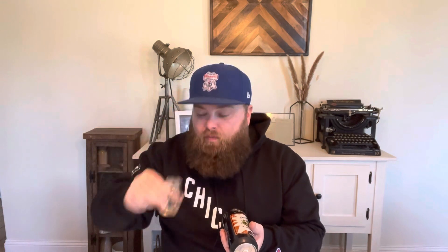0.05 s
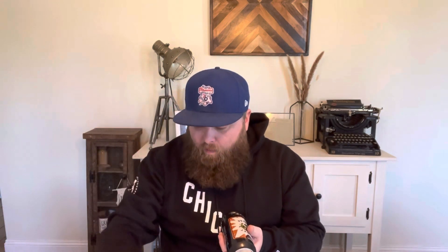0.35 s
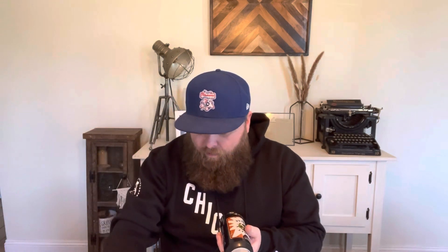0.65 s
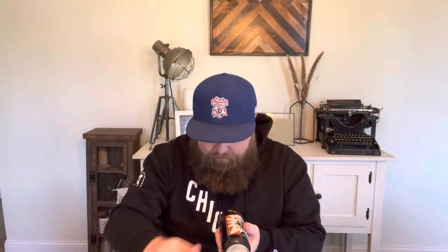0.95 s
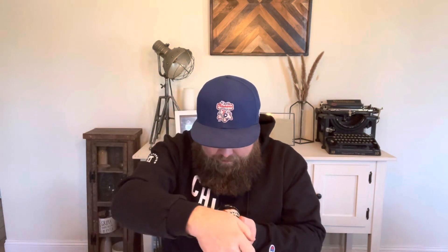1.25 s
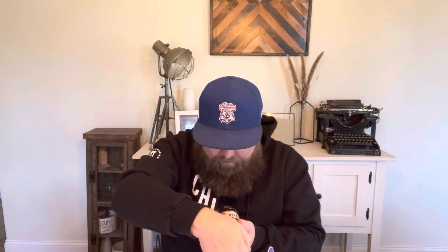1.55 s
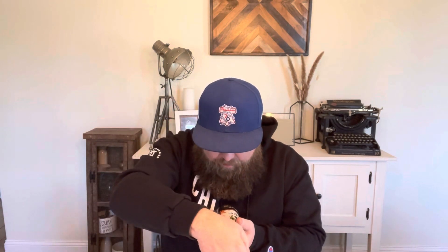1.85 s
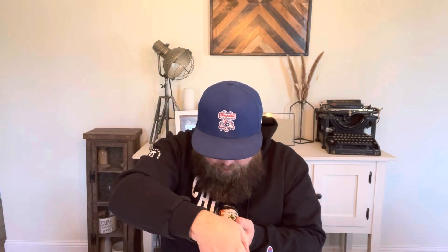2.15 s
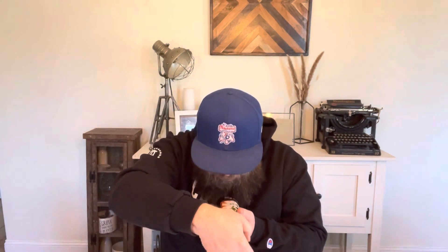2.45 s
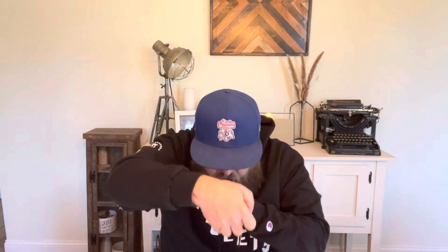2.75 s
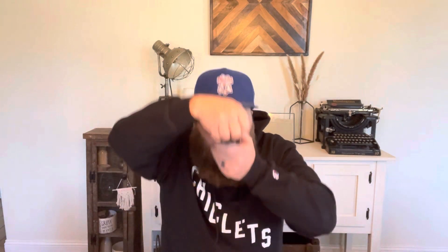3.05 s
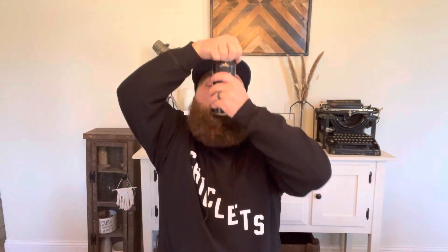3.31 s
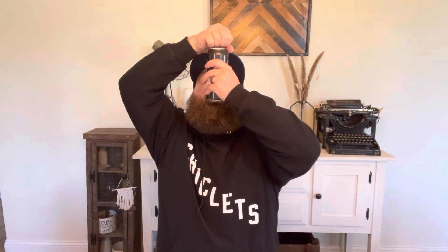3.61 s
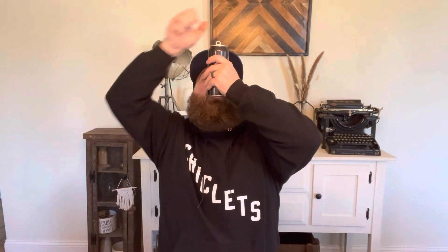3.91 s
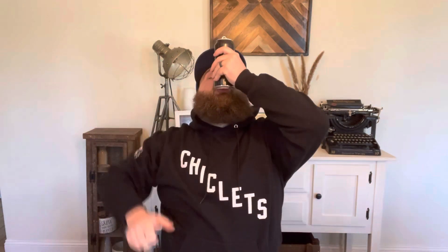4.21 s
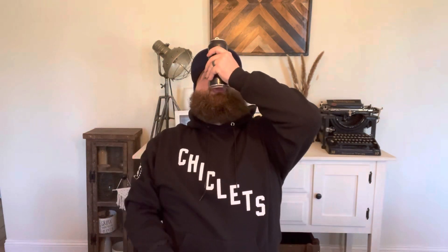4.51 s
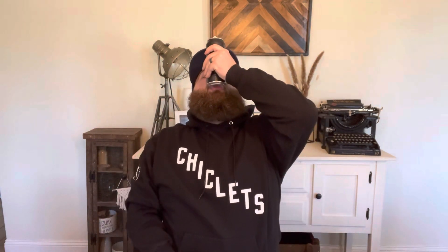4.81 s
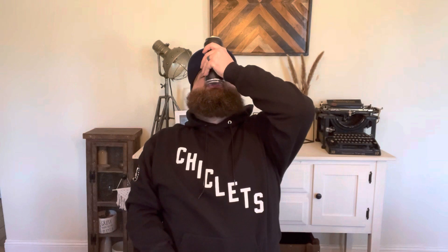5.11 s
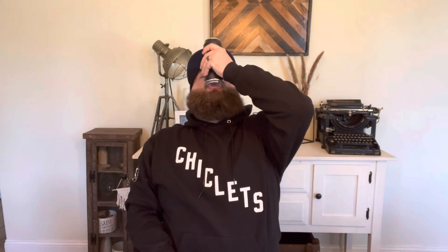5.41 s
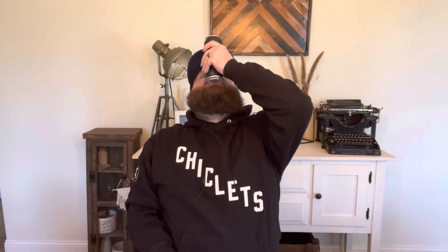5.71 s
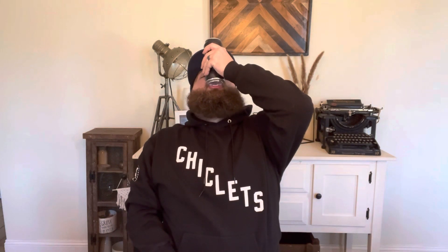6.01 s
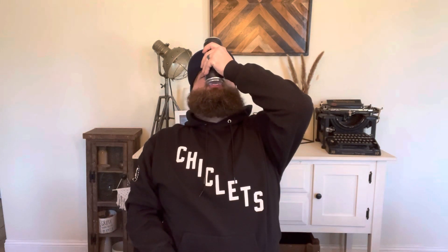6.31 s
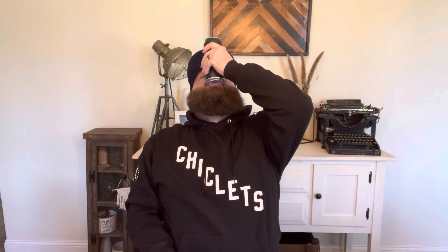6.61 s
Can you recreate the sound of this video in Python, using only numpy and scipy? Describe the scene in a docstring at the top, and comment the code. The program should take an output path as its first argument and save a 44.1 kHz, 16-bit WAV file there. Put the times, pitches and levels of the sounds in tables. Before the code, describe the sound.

In a small, bare room, a shot glass knocks down on a wooden table with a brief ring. A full beer can takes a dull knock, its tab clicks, and the lid snaps and tears open with a sharp spit of gas. The can glugs, a hand pats the table, and soft gulps follow before the thin metal crinkles faintly. Sleeves swish lightly over a low rumble, all heard from nearby.

```python
"""In a small, bare room, over a low rumble and a faint electric whine, a man's sleeve swishes and he
sets a shot glass on a wooden table; table and room ring. He lifts a beer can to his mouth: the tab
clicks, the sealed lid snaps, then tears with a spit of gas, and the can glugs as air slips in.
His free hand drops on the table, he gulps, and the thin can wall crinkles and gives in his grip."""
import sys
import numpy as np
from scipy import signal
from scipy.fft import rfft, irfft, next_fast_len
from scipy.io import wavfile

SR = 44100
rng = np.random.default_rng(int(sys.argv[2]) if len(sys.argv) > 2 else 0)


def inscribe(sig):
    """Save sig as 16-bit PCM at rate SR to the path in sys.argv[1].

    A 1-D sig is mono; a 2-D sig holds one channel per row.
    Samples are clipped to [-1, 1] before scaling.
    """
    pcm = np.round(np.clip(np.atleast_2d(sig).T, -1, 1) * 32767)
    wavfile.write(sys.argv[1], SR, pcm.astype(np.int16))


N = 302291
TIME = np.arange(N) / SR


def amp(db):
    """Decibels to gain."""
    return 10 ** (np.asarray(db) / 20)


def unit(x):
    """Scale to rms 1."""
    return x / np.sqrt(np.mean(x ** 2) + 1e-20)


def along(points, hz):
    """Read a curve of (Hz, value) points on a log frequency axis."""
    point_hz, values = np.transpose(points)
    return np.interp(np.log(hz + 1), np.log(point_hz + 1), values)


def filtered(x, response):
    """Shape x with a complex frequency response."""
    n = x.shape[-1]
    padded = next_fast_len(n + SR // 4)
    return irfft(rfft(x, padded) * response(np.fft.rfftfreq(padded, 1 / SR)), padded)[..., :n]


def noise(colour, size=N):
    """Coloured noise of rms 1."""
    return unit(filtered(rng.standard_normal(size), lambda hz: amp(along(colour, hz))))


def swell(peak_s, db, rise_s, fall_s):
    """A gain that climbs 60 dB to its peak in rise_s and dies by 60 dB in fall_s."""
    return amp(db - 60 * np.maximum((peak_s - TIME) / rise_s, (TIME - peak_s) / fall_s))


def add(track, s, sound):
    """Mix a sound into the track at s seconds."""
    part = track[:, max(round(s * SR), 0):][:, :sound.shape[-1]]
    part += sound[:, :part.shape[-1]]


def diffuse(pair):
    """Two unrelated signals as two close microphones hear them: alike mainly in the bass."""
    # Stereo image. Each row: frequency in Hz, left-right likeness from 0 to 1.
    likeness = [(60, 1), (150, 0.85), (350, 0.51), (700, 0), (1500, 0), (8000, 0.25)]

    def mid_side_gains(hz):
        angle = np.arccos(np.clip(along(likeness, hz), -1, 1)) / 2
        return np.array([np.cos(angle), np.sin(angle)])

    mid, side = filtered(pair, mid_side_gains)
    return np.array([mid + side, mid - side])


def in_room(x, wet_db, right_db):
    """Direct sound plus a fresh room tail, with the right channel right_db above the left."""
    # The room's decay. Each row: frequency in Hz, seconds to fall 60 dB.
    decay = [(120, 0.23), (400, 0.23), (1000, 0.36), (2500, 0.3), (5000, 0.33), (8000, 0.13), (13000, 0.17)]
    hz, t, spectrum = signal.stft(rng.standard_normal((2, SR // 2)), SR, nperseg=256)
    fade = amp(-60 * t / along(decay, hz)[:, None])
    tail = diffuse(signal.istft(spectrum * fade, SR, nperseg=256)[1])
    tail *= 1 - np.exp(-(np.arange(tail.shape[1]) / SR / 0.004) ** 2)  # reflections build over 4 ms
    impulse = amp(wet_db) * tail / np.linalg.norm(tail[0])
    impulse[[0, 1], [3, 0]] += 1  # the direct sound reaches the left 3 samples late
    return signal.fftconvolve(x[None], impulse, axes=1) * amp([[-right_db / 2], [right_db / 2]])


def strike(modes, soft_hz):
    """A body rings after one contact; a softer contact has a lower treble cutoff, soft_hz."""
    gains = amp(rng.standard_normal(len(modes)))  # each mode varies by about a decibel
    f = np.fft.rfftfreq(SR // 3, 1 / SR)
    body = sum((-1) ** k * gains[k] * amp(db) * 1j * f * width / (hz * hz - f * f + 1j * f * width)
               for k, (hz, width, db) in enumerate(modes))
    ring = irfft(body / (1 + 1j * f / soft_hz) ** 2)[:SR // 4]
    return ring * np.sqrt(SR / 100) / np.linalg.norm(ring)  # the energy of 10 ms at rms 1


def hits(contacts, modes, wet_db, right_db):
    """A run of contacts rings one body in the room."""
    out = np.zeros((2, N))
    for s, db, soft_hz in contacts:
        add(out, s, in_room(amp(db) * strike(modes, soft_hz), wet_db, right_db))
    return out


def background(rumble_db=-51, sink_db_per_s=0.6, air_db=-64, hiss_db=-82):
    """Building rumble sinks with one brief swell, a distant rush passes; air, hiss and hum stay even."""
    # Colours of the four noise beds. Each row: frequency in Hz, relative level in dB.
    rumble_colour = [(20, -21), (38, -12.5), (52, 1), (69, 5.5), (88, 1.5), (115, 8.5), (150, -7),
                     (200, -17), (400, -60.5)]
    air_colour = [(100, -3.5), (200, 1.5), (330, 0.5), (450, -5.5), (680, -7.5), (1000, -13), (1500, -26),
                  (2500, -30.5), (5000, -41.5)]
    rush_colour = [(100, -10.5), (200, 2.5), (290, 3), (470, -6.5), (650, -3.5), (880, -7), (1100, -13),
                   (1450, -17.5), (1800, -16.5), (2200, -27.5), (3200, -38.5), (6000, -49)]
    hiss_colour = [(500, 4.5), (3000, -1.5), (6000, -1.5), (8000, -10), (11000, -2.5), (13500, -6)]
    # Appliance hum and whine. Each row: pitch in Hz, level in dB.
    tones = [(70, -59.5), (317.6, -73), (635.2, -83.5), (10530, -92)]
    bed = lambda colour: unit(diffuse(noise(colour, (2, N))))
    heave = swell(peak_s=1.17, db=-49, rise_s=0.63, fall_s=2)
    rumble = (amp(rumble_db - sink_db_per_s * TIME) + heave) * bed(rumble_colour)
    air = amp(air_db) * bed(air_colour)
    rush = swell(peak_s=0.75, db=-52.5, rise_s=4.85, fall_s=8.2) * bed(rush_colour)
    hum = sum(amp(db) * np.sqrt(2) * np.sin(2 * np.pi * (hz * TIME + rng.random())) for hz, db in tones)
    microphone_hiss = amp(hiss_db) * bed(hiss_colour)
    return (rumble + air + rush + hum + microphone_hiss) * amp([[-1.1], [1.1]])  # leans right


def sleeves(trim_db=-1.5):
    """Soft cloth slides on cloth at each swing of an arm: a smooth swish."""
    # The cloth's colour. Each row: frequency in Hz, relative level in dB.
    colour = [(800, -7.5), (2500, -8.5), (4000, -10.5), (5500, -3), (6800, 0), (8200, -5), (10800, -2.5),
              (12300, -9.5), (14000, -13)]
    # An arm drops, a cuff brushes the can, both arms rise, one drops again.
    # Each row: peak in seconds, half length in seconds, level before trim in dB, treble cutoff in Hz.
    swings = [(0.154, 0.13, -60, 11600), (1.219, 0.01, -67.5, 13500), (2.583, 0.0056, -65, 13500),
              (3.197, 0.21, -64.5, 13200), (4.153, 0.29, -73, 14200), (4.392, 0.06, -71, 14000)]
    cloth, rub = noise(colour), np.zeros(N)
    for s, half, db, top_hz in swings:
        swish = signal.sosfilt(signal.butter(10, top_hz, fs=SR, output="sos"), cloth)
        rub += amp(db) * np.exp(-((TIME - s) / half) ** 2) * swish
    return amp(trim_db) * in_room(rub, wet_db=-2.5, right_db=2.5)[:, :N]


def grip():
    """The can's thin wall ticks under the fingers and gives with a dull crunch as it empties."""
    # The side buckles. Each row: start in seconds, level in dB, treble cutoff in Hz.
    dents = [(6.538, -56.5, 1500), (6.5425, -49, 4010), (6.553, -52.5, 6000), (6.563, -60, 4510)]
    # The dented side's modes. Each row: frequency in Hz, width in Hz, level in dB.
    side_modes = [(247, 160, -4.5), (616, 140, -6.5), (744, 51, 3), (1079, 500, -7), (1690, 120, -4.5),
                  (2090, 660, -13.5), (3330, 1700, -16.5), (4840, 1100, -19.5), (10200, 1900, -13.5)]
    # Crinkles, each at its own spot. Each row: start in seconds, level in dB, pitch in Hz.
    crinkles = [(1.601, -74, 4600), (1.629, -75, 3000), (5.897, -67.5, 2000), (5.988, -65, 2800),
                (6.009, -56, 4045), (6.09, -74, 5960), (6.294, -76.5, 2300)]
    # The dry upper wall's modes. Each row: multiple of the pitch, width in Hz, level in dB.
    upper_modes = [(0.24, 400, -4.5), (0.54, 300, -4), (0.69, 351, -2.5), (1, 380, 3.5), (1.5, 900, -7.5),
                   (2.6, 5000, -17)]
    out = hits(dents, side_modes, wet_db=2.5, right_db=1.5)
    for s, db, hz in crinkles:
        spot = [(hz * ratio, width, level) for ratio, width, level in upper_modes]
        add(out, s, in_room(amp(db) * strike(spot, soft_hz=6640), wet_db=-2.0, right_db=4.0))
    return out


def gulps(tick_count=120):
    """Each swallow is a brief, dense clump of tiny wet ticks."""
    # Soft swallows. Each row: start in seconds, level in dB, length in seconds.
    swallows = [(4.57, -53.5, 0.049), (4.655, -53.5, 0.044), (4.79, -57.5, 0.021), (4.871, -53.5, 0.041),
                (5.081, -55, 0.04), (5.208, -61, 0.025), (5.313, -62.5, 0.022), (5.437, -66, 0.035),
                (5.594, -64.5, 0.03)]
    # Their wet colour. Each row: frequency in Hz, relative level in dB.
    colour = [(220, 9), (450, 9), (750, 1.5), (1200, -7.5), (1800, -9), (3100, -11.5), (3800, -19.5),
              (4600, -19.5), (6000, -31), (12000, -31)]
    out = np.zeros((2, N))
    for s, db, length in swallows:
        when, size = rng.random(tick_count), rng.standard_normal(tick_count)
        ticks = np.bincount((when * length * SR).astype(int), size, SR // 8)
        clump = filtered(ticks, lambda hz: amp(along(colour, hz)))
        clump = clump * np.sqrt(SR / 100) / np.linalg.norm(clump)
        add(out, s, in_room(amp(db) * clump, wet_db=2.5, right_db=1.5))
    return out


def hand_pat():
    """The free hand drops flat on the table with a padded slap."""
    # Palm, then fingers. Each row: start in seconds, level in dB, treble cutoff in Hz.
    pats = [(4.3355, -41, 1500), (4.343, -42, 496), (4.368, -45, 690), (4.414, -52, 700)]
    # The slap's modes. Each row: frequency in Hz, width in Hz, level in dB.
    modes = [(127, 46, 4), (329.3, 93, 0), (486.5, 41, 8.5), (690, 270, 1.5), (850, 198, 2),
             (1240, 170, -13.5), (1550, 370, -17.5)]
    return hits(pats, modes, wet_db=5.0, right_db=2.0)


def shot_glass(thud_hz=145, thud_width_hz=60):
    """The glass knocks on the table with a thud and settles, and table and room ring."""
    # Landings. Each row: start in seconds, level in dB, treble cutoff in Hz, relative thud in dB.
    landings = [(0.532, -21.5, 900, -13), (0.545, -36.5, 606, -9.5), (0.578, -30.5, 790, -40.5)]
    # Resonances of the table and room. Each row: frequency in Hz, width in Hz, level in dB.
    modes = [(241, 33, -8.5), (296.2, 10.4, 14.5), (340, 65, -1.5), (386, 8.5, 15), (445, 63, -0.5),
             (497.5, 14, 12.5), (564, 55, -0.5), (662, 65, 0), (803, 143, -3.5), (1032, 81, 0),
             (1305, 130, -6), (2150, 1000, -14.5), (4100, 1100, -13.5), (9900, 3700, -14)]
    out = np.zeros((2, N))
    for s, db, soft_hz, thud_db in landings:
        ring = strike(modes, soft_hz)
        thud = amp(thud_db) * strike([(thud_hz, thud_width_hz, 0)], thud_hz)
        add(out, s, in_room(amp(db) * (ring + thud), wet_db=4.5, right_db=1.5))
    return out


def can_knocks():
    """Knocks on the full can ring dully in its liquid-loaded wall."""
    # Knocks. Each row: start in seconds, level in dB, treble cutoff in Hz.
    knocks = [(2.627, -31.5, 1920), (2.757, -60, 4950)]
    # The wall's modes. Each row: frequency in Hz, width in Hz, level in dB.
    modes = [(313, 62, 0), (375, 63, -1.5), (486, 104, 0), (752, 56, 5), (1015, 35, 3), (1440, 92, -5.5),
             (1734, 170, -2), (1985, 210, -3.5), (2770, 380, -12), (4320, 180, -30), (5130, 590, -22.5),
             (6270, 800, -18)]
    return hits(knocks, modes, wet_db=2.5, right_db=2.0)


def glugs():
    """Each slug of air entering the can rings as a short tone that slides as the cavity changes size."""
    # Slugs. Each row: start in seconds, level in dB, first and last pitch in Hz, length in seconds.
    slugs = [(3.808, -27, 892.5, 802, 0.025), (3.836, -39, 789, 788, 0.035),
             (3.871, -46.5, 402, 564, 0.027)]
    out = np.zeros((2, N))
    for s, db, first_hz, last_hz, length in slugs:
        progress = np.linspace(0, 1, round(length * SR))
        pitch_hz = first_hz + (last_hz - first_hz) * progress
        tone = np.sin(2 * np.pi * np.cumsum(pitch_hz) / SR)
        envelope = np.sqrt(progress) * (1 - progress ** 2)
        add(out, s, in_room(amp(db) * unit(envelope * tone), wet_db=-8.5, right_db=1.0))
    return out


def tab_clicks():
    """The small metal tab rings with a bright double click."""
    # Clicks. Each row: start in seconds, level in dB, treble cutoff in Hz.
    clicks = [(3.1668, -34.5, 12770), (3.1695, -39.5, 9290)]
    # The tab's modes. Each row: frequency in Hz, width in Hz, level in dB.
    modes = [(500, 120, -5), (1020, 120, -8), (1560, 220, -10), (2050, 250, -13), (2630, 300, -14),
             (3998, 150, 2), (5240, 270, -2), (6300, 440, -8), (7900, 400, -13), (9350, 700, -4),
             (12600, 1830, -11.5)]
    return hits(clicks, modes, wet_db=-4, right_db=3.0)


def lid_snaps():
    """The taut, still sealed lid snaps, ever louder and brighter."""
    # Snaps. Each row: start in seconds, level in dB, treble cutoff in Hz.
    snaps = [(3.296, -59.5, 1000), (3.306, -56.5, 1000), (3.440, -52, 1500), (3.448, -40.5, 2800),
             (3.4558, -23.5, 9000), (3.4571, -18, 13230)]
    # The sealed lid's modes. Each row: frequency in Hz, width in Hz, level in dB.
    modes = [(900, 490, -14.5), (1614, 80, -2), (1800, 30, 6.5), (2050, 330, -5), (3400, 250, -10.5),
             (4000, 250, -1.5), (4630, 150, 6.5), (4960, 200, -1.5), (5720, 300, -5.5), (7606, 860, -9.5),
             (11510, 3300, -14)]
    return hits(snaps, modes, wet_db=-2.5, right_db=4.5)


def lid_tear(rip_s=3.5275, gap_s=0.0043, scatter_s=0.0006, rip_db=-20, loss_db=1, soft_hz=4400):
    """The lid ruptures, sticks and slips along its score in five weakening jerks, then folds in."""
    # The rupture and the fold. Each row: start in seconds, level in dB, treble cutoff in Hz.
    tears = [(3.511, -28.5, 4500), (3.5150, -20.5, 12000), (3.8095, -42.5, 9100), (3.815, -51, 9000)]
    # The open can's modes, air cavity first. Each row: frequency in Hz, width in Hz, level in dB.
    modes = [(604, 220, -4), (832, 55, 7), (1477, 70, -4.5), (1614, 48, -1), (2026, 54, 7), (2224, 26, 8),
             (2437, 27, 6), (2720, 45, -1.5), (3200, 210, -0.5), (4400, 1000, -10.5), (5450, 600, -4),
             (8350, 2400, -11), (11800, 2900, -10)]
    jerks = [(rip_s + k * gap_s + scatter_s * jitter, rip_db - k * loss_db, soft_hz)
             for k, jitter in enumerate(rng.standard_normal(5))]
    return hits(tears + jerks, modes, wet_db=-2.0, right_db=1.5)


def gas():
    """Gas hisses out through the tear: a sharp spit, the main blow-off, a last puff of foam."""
    # Spurts. Each row: peak in seconds, level in dB, rise and fall in seconds per 60 dB.
    spurts = [(3.5152, -10.5, 0.009, 0.0214), (3.532, -22.5, 0.043, 0.3259), (3.81, -56.5, 0.35, 0.4)]
    # The jet's colour. Each row: frequency in Hz, relative level in dB.
    colour = [(300, -30.5), (900, -2), (2200, -2.5), (4500, -6), (6500, -4), (8500, -3), (12300, -13),
              (14000, -25)]
    flow = sum(swell(*spurt) for spurt in spurts)
    return in_room(flow * noise(colour), wet_db=-7.5, right_db=0.0)[:, :N]


def scene():
    """The stereo mix of table, can, drinking and room."""
    table = shot_glass() + hand_pat()
    can = can_knocks() + tab_clicks() + lid_snaps() + lid_tear() + gas() + glugs()
    return table + can + gulps() + grip() + sleeves() + background()


def record(dry, top_hz=14200):
    """Clip at full scale, then cut the treble steeply above top_hz."""
    return filtered(np.clip(dry, -1, 1), lambda hz: 1 / np.sqrt(1 + (hz / top_hz) ** 60))


dry = scene()
out = record(dry)
inscribe(out)
```